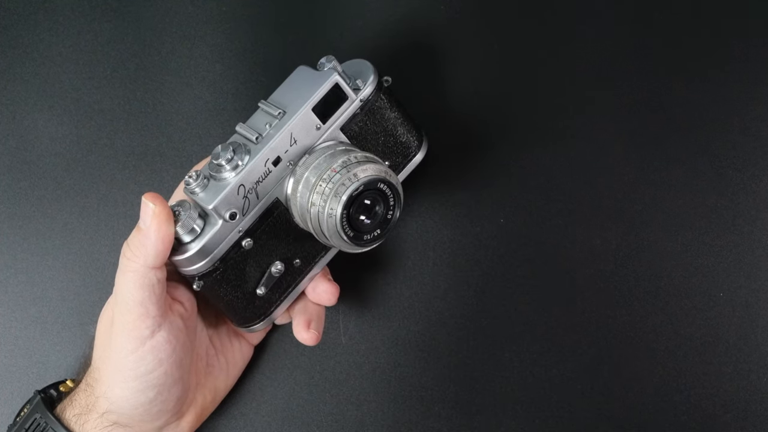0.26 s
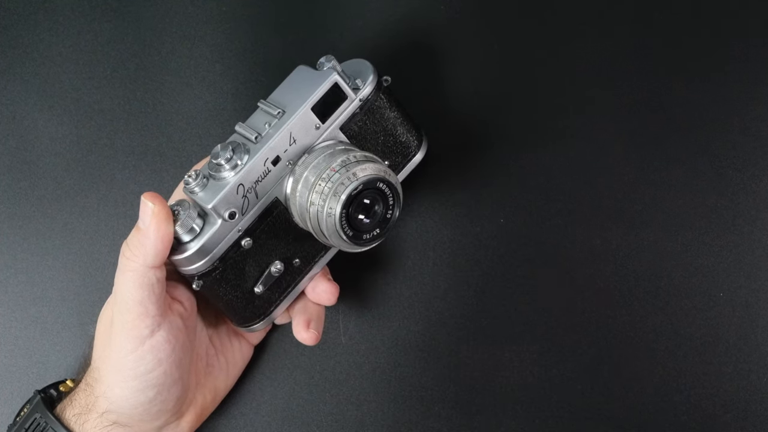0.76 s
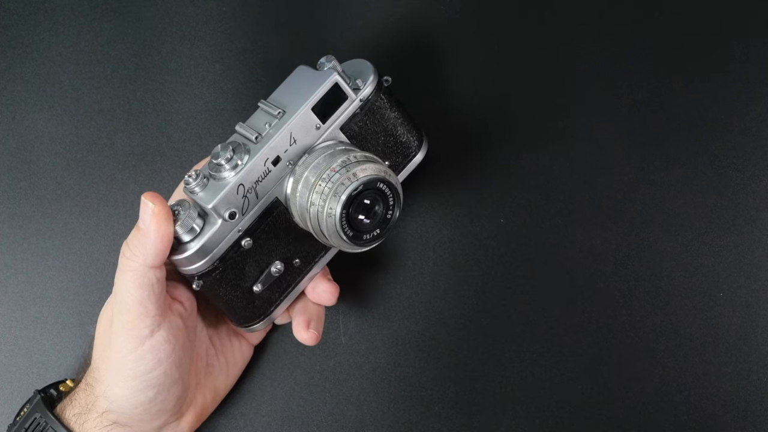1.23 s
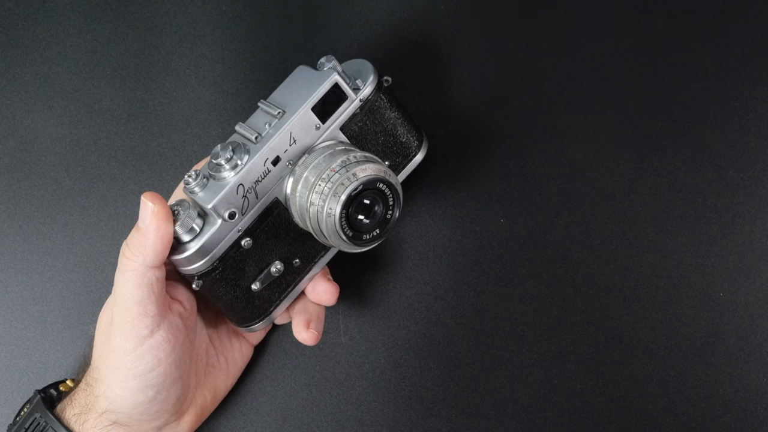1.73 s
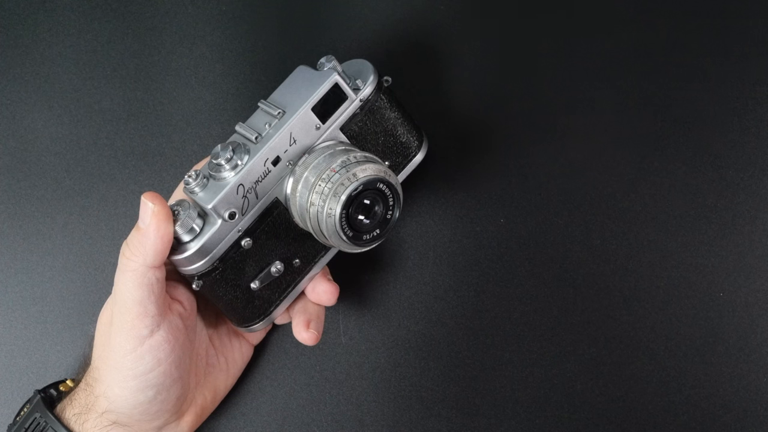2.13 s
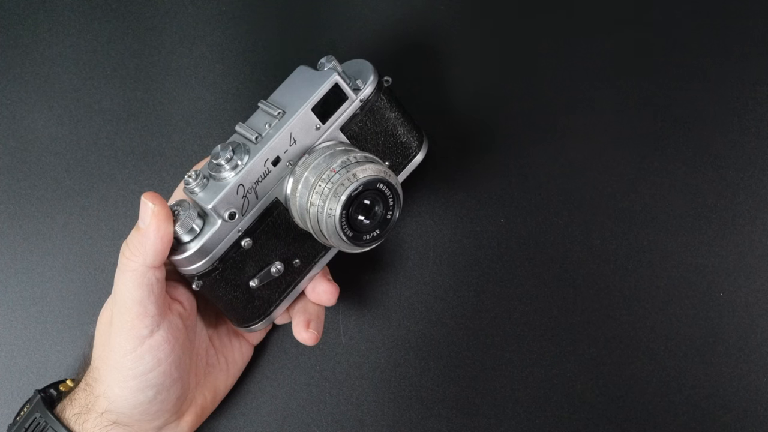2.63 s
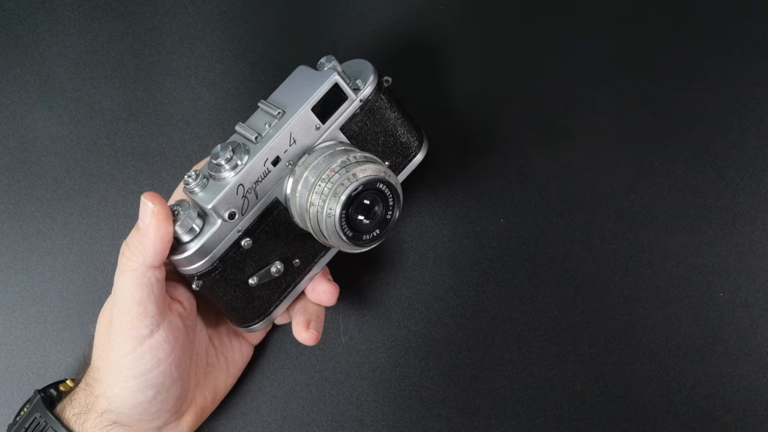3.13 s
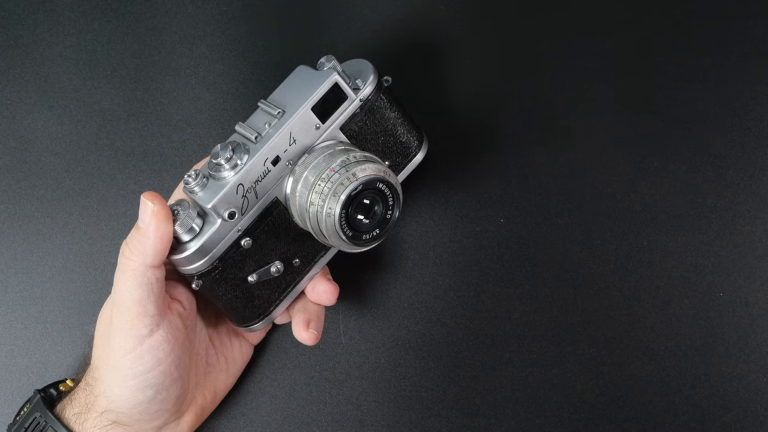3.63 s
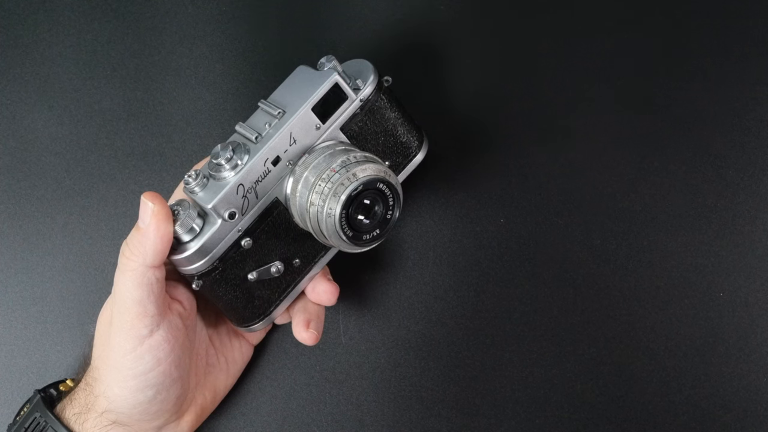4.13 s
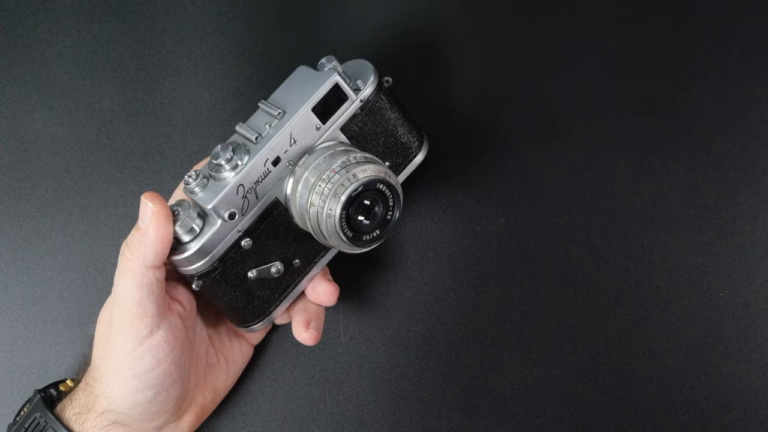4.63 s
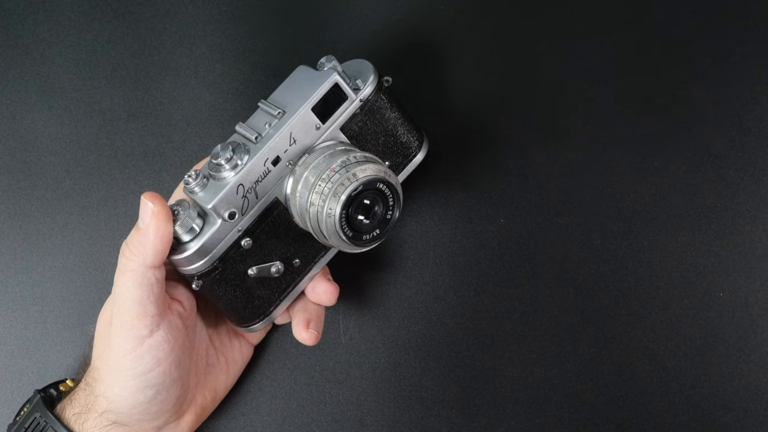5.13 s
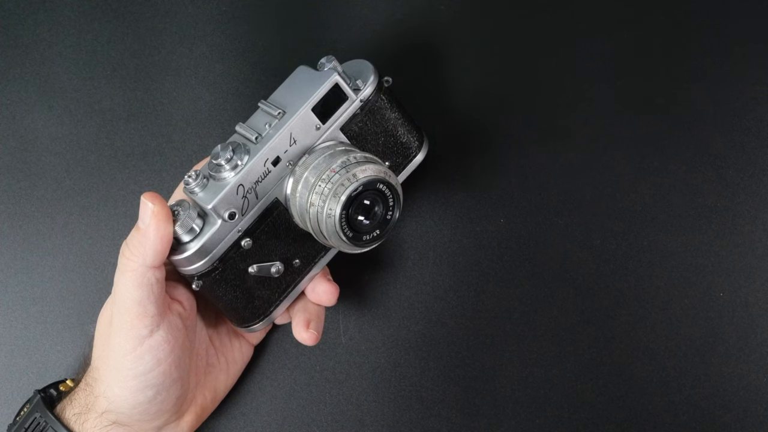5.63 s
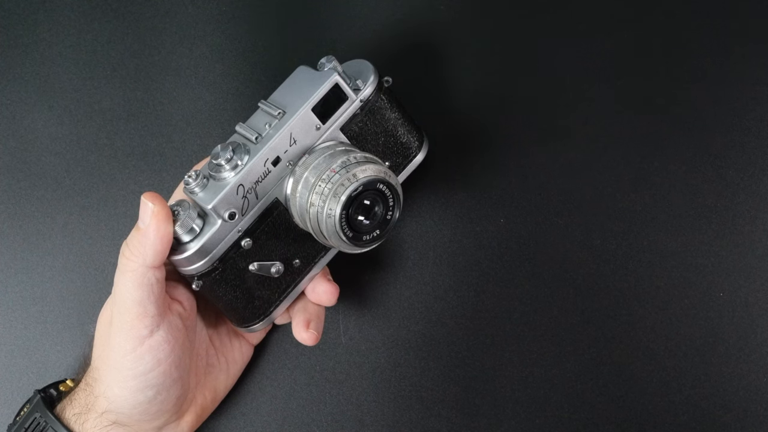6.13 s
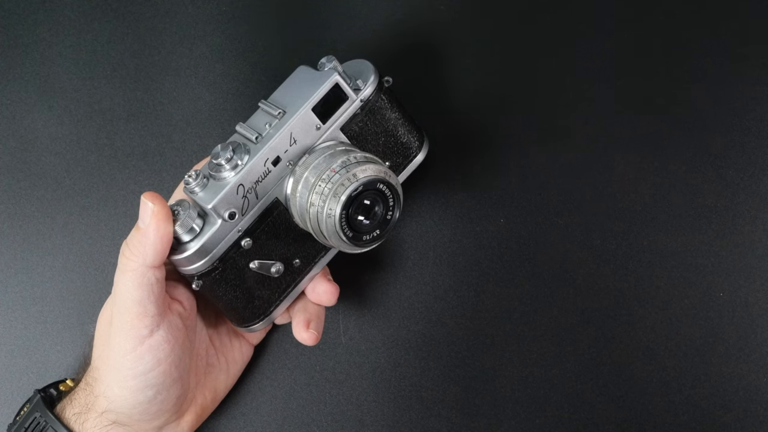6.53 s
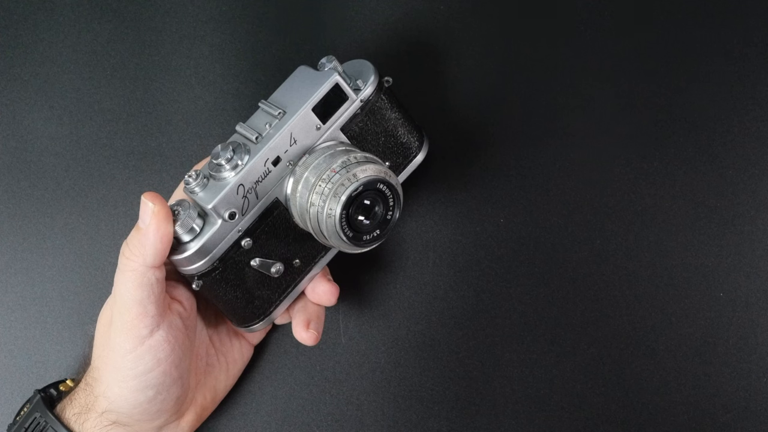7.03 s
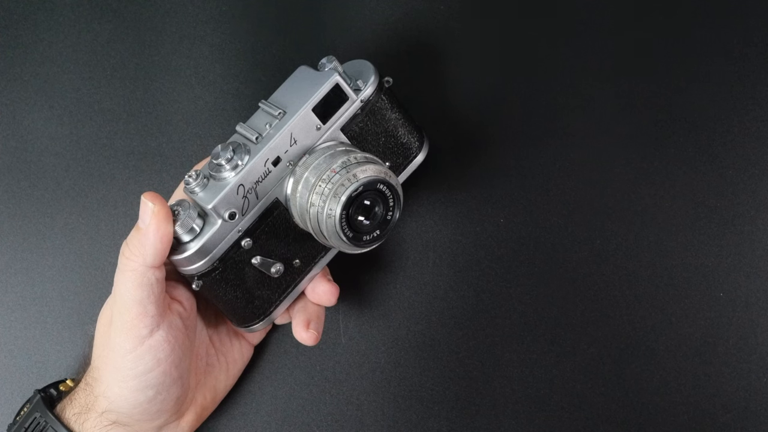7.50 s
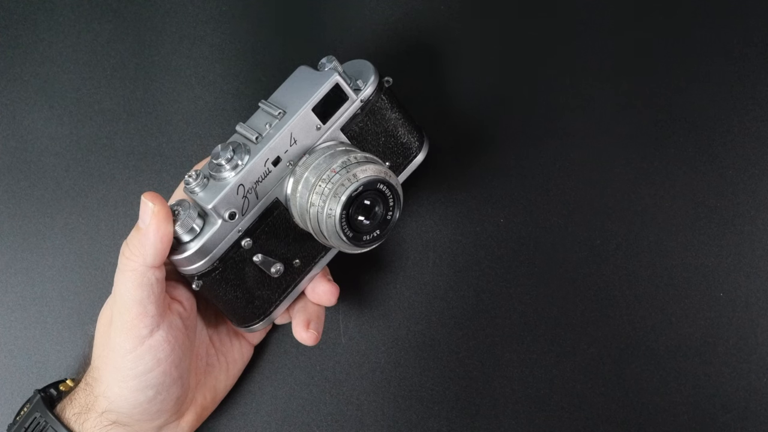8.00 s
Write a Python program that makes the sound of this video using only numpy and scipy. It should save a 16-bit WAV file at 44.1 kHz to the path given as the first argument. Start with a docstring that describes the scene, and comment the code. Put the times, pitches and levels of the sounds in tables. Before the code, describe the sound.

From 0 to about 8.3 seconds a small spring-driven timer in a hand-held metal camera runs without pause, heard very close in a quiet room. Its ticks and tocks, around 108 pairs a second, blend into a faint but clear, grainy whirr: dry steel chatter with bright ringing, lighter body-plate resonance and a fine random gear rattle, no bass. The pace wavers a little in regular cycles, steadier from 0.5 to 5 seconds, then slightly slower and more uneven. Soft dull thuds from the hand appear singly or in pairs, near 0.8, 1.4, 2, 2.7, 3.5, 4.1, 5.7 and 6.75 seconds. The mechanism sags around 6.5, catches with a few tiny brighter clicks at 6.54, races briefly near 6.9, then settles. The tone slowly shifts and weakens very slightly. Low hum, hand rumble and faint hiss stay beneath; room echo is short. It ends still whirring.

```python
"""The self-timer of a hand-held camera runs down close to the microphone in a quiet room.
A spring drives a 16-tooth wheel; its pallet rocks about 108 times a second, a tick and a tock each swing.
Each blow sets ringing filters going, tuned to the small steel parts and the body plates; dry snaps add bite.
Gears rattle at random moments all along and one catches late in the run, with a few brighter clicks.
Soft low thuds, hand rumble, hum tones, room noise and hiss lie below, made from swells, sines and noise."""
import sys
import numpy as np
from scipy import signal
from scipy.fft import rfft, irfft
from scipy.io import wavfile

SR = 44100
rng = np.random.default_rng(int(sys.argv[2]) if len(sys.argv) > 2 else 0)


def int16_out(signal):
    """Quantize to a 16-bit WAV file."""
    q = np.round(np.clip(np.atleast_2d(signal).T, -1, 1) * 32767)
    wavfile.write(sys.argv[1], SR, q.astype(np.int16))


N = 364266
TIME_S = np.arange(N) / SR

# how each tooth of the wheel strikes: (tick level [dB], tock level [dB], lateness [ms])
TEETH = [(-1.5, -0.5, -0.17), (0.1, 0.8, -0.31), (-1.1, -0.5, -0.24), (-0.5, -2.2, -0.11),
         (-1.5, 0.1, -0.01), (-0.6, 1.1, 0.03), (-0.5, -2, 0.03), (-3, -1, 0.14), (-1.8, 0.5, 0.14),
         (-0.4, -0.7, 0.03), (0, -1.5, 0.03), (-1.6, -0.5, 0.12), (-2.3, 0, 0.13), (-1.5, 0.5, 0.09),
         (-0.7, -1.2, 0.1), (-1.2, 1.5, 0.01)]
# how much stronger a tock is than a tick: (frequency [Hz], tock over tick [dB])
TOCK = [(1200, -13), (1800, 4.5), (2500, -1), (4500, -2), (6200, 5.5), (7200, 1.7), (9000, -2), (14000, 1)]
JITTER_MS = .12   # random timing error of blows and recoils


def from_db(db):
    """Turn a level in dB into a gain."""
    return 10 ** (np.asarray(db) / 20)


def rms_one(x):
    """Scale a signal to an rms (a kind of average size) of 1."""
    return x / np.sqrt(np.mean(x ** 2) + 1e-30)


def at_hz(points, hz):
    """Read a spectrum between its points, on a log-frequency axis."""
    points_hz, points_db = np.transpose(points)
    return np.interp(np.log(hz), np.log(points_hz), points_db)


def over_time(points):
    """Draw straight lines between (time, value) points, one value per sample."""
    return np.interp(TIME_S, *np.transpose(points))


def resonance(x, hz, width_hz):
    """A ringing part as a two-pole filter of gain 1 at its peak; a narrow one rings longer."""
    r = np.exp(-np.pi * max(width_hz, 1) / SR)
    top = [(1 - r * r) / 2, 0, (r * r - 1) / 2]
    bottom = [1, -2 * r * np.cos(2 * np.pi * hz / SR), r * r]
    return signal.lfilter(top, bottom, x + 1e-18)


def swing_count():
    """Count the swings: pace summed over time, pushed ahead and held back in regular cycles."""
    # pace under the spring, sagging before the catch and racing after: (time [s], pace [swings/s])
    pace = [(0.0, 108.33), (0.08, 112.21), (0.22, 102.68), (0.29, 107.55), (0.43, 109.18), (1.73, 110.22),
            (1.87, 111.14), (2.11, 105.61), (2.27, 109.66), (2.39, 113.25), (2.57, 109.9), (3.2, 112.28),
            (3.37, 111.59), (4.93, 108.93), (5.07, 102.23), (5.33, 104.77), (5.39, 108.72), (5.54, 103.63),
            (5.62, 107.16), (5.86, 100.09), (6.22, 103.43), (6.29, 101.75), (6.35, 108.5), (6.46, 96.79),
            (6.56, 106.79), (6.81, 110.88), (6.86, 115.57), (6.98, 110.76), (7.24, 105.29), (8.3, 106.41)]
    # periodic unevenness of the pace:
    # (cycle length [swings], push ahead and behind [swings], place of greatest lead [swings])
    pace_cycles = [(75.1, .26, 3.41), (82.4, .069, 6.5), (54, .05, -25.6), (36.3, .032, 1.2)]
    even = -.23 + np.cumsum(over_time(pace)) / SR   # starts just before swing 0
    count = even
    for _ in range(4):   # the cycles turn with the count itself, so refine it step by step
        count = even + sum(lead * np.cos(2 * np.pi * (count - ahead) / cycle)
                           for cycle, lead, ahead in pace_cycles)
    return count


def blows(swings):
    """Sample, strength in dB and kind (0 tick, 1 tock) of each pallet blow, by tooth and by chance."""
    tick_at, tock_at = -.14, .34   # place in the swing (swings)
    blow_spread_db = .5
    number = np.arange(2 * int(swings[-1]))
    kind = number % 2
    tooth = np.array(TEETH)[number // 2 % len(TEETH)]
    chance = rng.standard_normal((len(number), 2))
    when_s = np.interp(number // 2 + np.where(kind, tock_at, tick_at), swings, TIME_S)
    when_s = when_s + (tooth[:, 2] + JITTER_MS * chance[:, 0]) / 1000
    level_db = np.where(kind, tooth[:, 1], tooth[:, 0]) + blow_spread_db * chance[:, 1]
    return np.clip((when_s * SR).astype(int), 0, N - 1), level_db, kind


def recoils(swings):
    """Sample of each recoil: the wheel kicks back against its pinion after each tock."""
    recoil_at = .66   # place in the swing (swings)
    number = np.arange(int(swings[-1]))
    when = np.interp(number + recoil_at, swings, np.arange(N))
    when = when + JITTER_MS * rng.standard_normal(len(number)) * SR / 1000
    return np.clip(when, 0, N - 1).astype(int)


def rattle():
    """Loose gear teeth click at random moments, equally hard, pushing either way; rms 1."""
    clicks_per_s = 1500
    signs = rng.choice([-1, 1], N)
    return rms_one(signs * (rng.random(N) < clicks_per_s / SR))


def favoured_regions(count, spread_db):
    """Where a blow lands favours some regions of modes: part habit of the tooth, part chance, in dB."""
    tooth_share = .3      # part of the spread that returns with the same tooth
    linger_db, linger_swings = 0.54, 18
    top_db = 5            # favour above 0 dB levels off towards this
    kinds = 2 * len(TEETH)   # a tick and a tock for each tooth
    habit = rng.standard_normal((kinds, len(spread_db)))[np.arange(count) % kinds]
    fresh = rng.standard_normal((count, len(spread_db)))
    favour_db = spread_db * (np.sqrt(tooth_share) * habit + np.sqrt(1 - tooth_share) * fresh)
    # this noise tends to change sign at each blow, so the balance of tick and tock wanders slowly
    keep = np.exp(-.5 / linger_swings)
    wander = signal.lfilter([1], [1, keep], rng.standard_normal(fresh.shape), axis=0)
    favour_db = favour_db + linger_db * rms_one(wander)
    return np.where(favour_db > 0, top_db * np.tanh(favour_db / top_db), favour_db)


def ringing(modes, at, level_db, kind, back, gears):
    """Blows, bounces, recoils and rattle push each mode, one way the parts can ring; rms 1."""
    # slow shift of the whirr as the spring unwinds, with a jump back at the catch: (time [s], colour [-1..1])
    colour_points = [(0, 0.78), (.65, 0.95), (1.1, 0.62), (2.3, 0.091), (3.2, 0.41), (3.7, -0.22),
                     (5.3, -0.43), (6.52, -0.7), (6.56, -0.3), (6.95, -0.34), (7.4, -0.52), (8.26, -0.4)]
    # regions that a blow may favour: (frequency [Hz], spread from blow to blow [dB])
    regions = [(1200, -0.1), (2400, 0.5), (4500, 1.5), (6000, 1.5), (7100, 2), (8600, 2.5), (11000, 2),
               (14000, .8)]
    # middle body modes, of which only the ups and downs about the mean count: (time [s], level [dB])
    middle_points = [(0.0, -54), (0.02, -53.5), (0.27, -56), (0.69, -54), (0.8, -57), (0.83, -55),
                     (2.07, -55), (2.11, -58.5), (2.14, -55.5), (2.23, -54), (2.42, -55.5), (4.85, -55),
                     (5.1, -56.5), (5.5, -55), (5.59, -56.5), (6.37, -55), (6.46, -56.5), (6.9, -54.5),
                     (7.01, -57), (7.08, -53), (7.13, -57), (7.27, -55.5), (8.17, -55), (8.26, -55)]
    # rattle of the gears: (frequency [Hz], gears over blows [dB])
    rattle_spectrum = [(1200, -6), (2000, 2.5), (4000, 0.5), (5400, -3.5), (6300, -6), (7200, -18.5),
                       (9000, -19), (15000, -14)]
    # recoil of the wheel: (frequency [Hz], recoil over tick [dB])
    recoil_spectrum = [(1200, -21), (2500, -3), (4500, -7), (7000, -20), (9000, -13), (14000, -11)]
    mode_spread_db = 1.03
    bounce_ms, bounce_db = 1.1, -10.5
    contact_ms = .4        # a blow reaches each local mode at a moment of its own within this time
    whole_body_hz = 3500   # modes up to here are pushed the same way by every blow
    in_step_hz = 1600      # up to here they swing together, above it neighbours swing against each other
    skirt_hz = 900         # a push reaches a mode only through a band this wide around it

    out = np.zeros(N)
    colour = over_time(colour_points)
    middle_db = over_time(middle_points)
    middle_db = middle_db - middle_db.mean()
    bounce_delay = (bounce_ms * rng.uniform(.5, 1.5, len(at)) * SR / 1000).astype(int)
    again = np.minimum(at + bounce_delay, N - 1)
    centres, spread_db = np.transpose(regions)
    favour_db = favoured_regions(len(at), spread_db)

    for k, (hz, width_hz, mode_db, shift_db) in enumerate(modes):
        local = hz > whole_body_hz
        region_db = favour_db[:, np.argmin(abs(np.log(centres / hz)))]
        chance_db = mode_spread_db * rng.standard_normal(len(at))
        strength = from_db(level_db + region_db + kind * at_hz(TOCK, hz) + chance_db)
        recoil = from_db(at_hz(recoil_spectrum, hz)) * np.ones(len(back)) * (-1) ** k
        late = np.zeros(len(at), int)
        if local:
            strength = strength * rng.choice([-1, 1], len(at))
            recoil = recoil * rng.choice([-1, 1], len(back))
            late = (contact_ms * rng.random(len(at)) * SR / 1000).astype(int)
        if hz > in_step_hz:
            strength = strength * (-1) ** k

        clicks = np.zeros(N)
        clicks[np.minimum(again + late, N - 1)] = strength * from_db(bounce_db)
        clicks[np.minimum(at + late, N - 1)] = strength
        clicks[back] = recoil
        force = rms_one(rms_one(clicks) + from_db(at_hz(rattle_spectrum, hz)) * gears)
        ring = resonance(resonance(force, hz, skirt_hz), hz, width_hz)
        gain_db = mode_db + shift_db * colour
        if 1950 < hz < 3600:   # the middle body modes
            gain_db = gain_db + middle_db
        out += from_db(gain_db) * ring
    return rms_one(out)


def snap(at, level_db, kind):
    """Dry snap of steel on steel: each blow clicks in a few wide bands that hardly ring."""
    # bands of the snap: (frequency [Hz], width [Hz], level [dB])
    snap_bands = [(2710, 1500, -68.5), (5130, 1800, -65.5), (8690, 1600, -65), (10400, 1400, -77.5)]
    snap_spread_db = 2
    out = np.zeros(N)
    for hz, width_hz, band_db in snap_bands:
        chance_db = snap_spread_db * rng.standard_normal(len(at))
        clicks = np.zeros(N)
        clicks[at] = from_db(level_db + kind * at_hz(TOCK, hz) + chance_db)
        band = resonance(resonance(clicks, hz, width_hz), hz, width_hz)
        out += from_db(band_db) * rms_one(band)
    return out


def drive(swings, start_db, db_per_s, db_per_pace):
    """Loudness follows the pace of the moment and fades as the spring unwinds."""
    mean_pace = 108   # swings per s
    pace = np.gradient(swings) * SR
    return from_db(start_db + db_per_s * TIME_S + db_per_pace * (pace - mean_pace))


def clockwork():
    """Escapement and gears ring the steel parts and the body; the small body radiates no bass."""
    # modes of pallet and wheel: (frequency [Hz], width [Hz], level [dB], shift [dB per unit of colour])
    steel_modes = [(5860, 120, -8.5, 1.5), (6047, 44, -3, 0.5), (6214, 134, -3, -5.5), (6440, 120, -6, 5.5),
                   (6840, 43, -8, 1.1), (6779, 30, -1, -6), (6943, 300, 1, 0.5), (7140, 180, 0.5, -1),
                   (7153, 195, -1, 2), (7305, 41, -1, -3.5), (7490, 60, -1.5, 6.5), (8020, 88, 0.5, 0.5),
                   (8390, 380, -4.5, -3), (8660, 450, -7, 4.5), (8970, 67, -6, 4), (9083, 68, -2, -1.5),
                   (9600, 32, -29, -3), (10100, 270, -13, -1.5), (10200, 150, -23, 3),
                   (10530, 25, -10.5, -4), (10700, 42, -16, 0), (10960, 220, -9, -0.5),
                   (11240, 32, -21, -2), (11670, 130, -15.5, -4), (11600, 32, -19, 7), (12200, 271, -16, 0),
                   (12900, 330, -23, 0.1), (12900, 32, -21, -5), (13553, 110, -19, -3),
                   (13700, 240, -16, -1), (15400, 120, -52, -6)]
    # modes of the body plates: (frequency [Hz], width [Hz], level [dB], shift [dB per unit of colour])
    plate_modes = [(1202, 63, -3.5, -1.5), (1259, 71, -1, 0), (1391, 103, -2.5, -0.5), (1522, 33, -4.5, 3),
                   (1733, 210, -23, 3.5), (1813, 32, -17, 3), (2008, 125, -4.5, -3), (2106, 42, 1, -1.7),
                   (2206, 80, 1.5, -1.5), (2281, 38, 1.5, -0.5), (2387, 150, -8.5, 3), (2534, 51, -2, -0.3),
                   (2658, 44, 1.5, 1.5), (2720, 44, 0.5, -1.5), (3060, 100, -1, 0), (3182, 25, -1.5, -0.5),
                   (3310, 130, -2, 0), (3555, 58, -6, -1), (3720, 68, -2, 1.1), (4006, 120, -6, 0),
                   (4173, 86, -8.5, 2), (4357, 61, -4, 4.5), (4630, 110, -5.5, -5.5), (4773, 28, -7, -4),
                   (4830, 91, -9.5, 5), (5016, 32, -2, -5), (5188, 61, -5.5, -2.5), (5245, 71, -4, 0.5),
                   (5460, 64, -9, 1.5), (5780, 54, -9.5, 1)]
    swings = swing_count()
    hits = blows(swings)
    back, gears = recoils(swings), rattle()
    steel_gain = drive(swings, start_db=-53, db_per_s=-0.14, db_per_pace=0.12)
    plates_gain = drive(swings, start_db=-52, db_per_s=-0.053, db_per_pace=0.12)
    steel = steel_gain * ringing(steel_modes, *hits, back, gears)
    plates = plates_gain * ringing(plate_modes, *hits, back, gears)
    no_bass = signal.butter(8, 1080, "high", fs=SR, output="sos")   # edge in Hz
    return signal.sosfilt(no_bass, steel + plates + snap(*hits) + catch())


def room(x):
    """Echoes of the room as a tail of dying noise, duller than the direct sound; tail energy 1."""
    t60_s = 0.15   # time to die away by 60 dB
    t = np.arange(int(.5 * SR)) / SR
    dull_noise = signal.lfilter([1], [1, -.5], rng.standard_normal(len(t)))
    tail = dull_noise * from_db(-60 * t / t60_s) * (t > .004)   # the first echo comes after 4 ms
    return signal.fftconvolve(x, tail / np.sqrt(np.sum(tail ** 2)))[:N]


def background():
    """Filtered noise for room, hand rumble and wavering hum tones; a sine hum; microphone hiss."""
    # spectrum of the room noise, of which only the shape counts: (frequency [Hz], level per Hz [dB])
    air_spectrum = [(20, -38), (40, -13.5), (70, -15), (150, -10), (190, -2.5), (240, -10.5), (308, -2.5),
                    (465, -9.5), (630, -6), (700, -12.5), (804, -4.5), (950, -17), (1300, -26)]
    # rumble of the holding hand: (time [s], level [dB])
    rumble_level = [(0, -73.5), (.5, -83.5), (.92, -72), (2.05, -82.5), (3.2, -86.5), (4.0, -80),
                    (6.3, -88), (6.7, -82), (8.26, -93)]
    # wavering hum tones: (frequency [Hz], width [Hz], level [dB])
    hum_tones = [(191, 6.7, -81), (290.6, 8.3, -87.5), (344.7, 10, -85.5), (638, 8.3, -89),
                 (804, 11, -87.5), (863, 15, -89.5)]
    # random ups and downs of the low hum: (time [s], level [dB])
    low_hum_wander = [(0.0, -79), (.6, -78.5), (1.2, -77), (2, -81), (2.6, -76), (3.3, -80), (3.6, -79),
                      (4.05, -80.5), (4.09, -70), (4.85, -88), (5.02, -67), (5.22, -92), (5.27, -75),
                      (6.81, -80), (7.27, -89), (7.32, -78), (8.14, -78), (8.26, -87)]
    low_hum_hz, hiss_db = 191.72, -76.5
    air_db, air_db_per_s = -69, -0.29   # level at the start, and its slow fade

    hz = np.maximum(np.arange(N // 2 + 1) * SR / N, 1)
    air = rms_one(irfft(rfft(rng.standard_normal(N)) * from_db(at_hz(air_spectrum, hz)), N))
    air = from_db(air_db + air_db_per_s * TIME_S) * air

    low_band = signal.butter(2, [80, 180], "band", fs=SR, output="sos")
    low = signal.sosfilt(low_band, rng.standard_normal(N))
    rumble = from_db(over_time(rumble_level)) * rms_one(low)

    hum = np.sqrt(2) * np.sin(2 * np.pi * low_hum_hz * TIME_S)   # rms 1
    hum = from_db(over_time(low_hum_wander)) * hum
    for tone_hz, width_hz, level_db in hum_tones:
        hum += from_db(level_db) * rms_one(resonance(rng.standard_normal(N), tone_hz, width_hz))
    hiss = from_db(hiss_db) * rng.standard_normal(N)
    return air + rumble + hum + hiss


def thuds():
    """Soft thuds through the hand: about two cycles of low swing under a smooth hump."""
    # the thuds: (time [s], level [dB], frequency [Hz])
    thud_list = [(0.155, -59, 145), (0.75, -57, 170), (0.796, -58, 131), (1.423, -58, 156),
                 (2.04, -58, 131), (2.056, -59, 178), (2.684, -57.5, 149), (3.349, -56, 152),
                 (3.505, -55, 175), (3.509, -62, 400), (3.531, -60, 124), (4.058, -55, 159),
                 (4.097, -57.5, 188), (4.536, -58, 238), (4.828, -59.5, 133), (5.191, -63, 167),
                 (5.732, -54, 150), (6.652, -60, 165), (6.758, -55, 194), (6.762, -64, 350),
                 (7.514, -58, 150)]
    push = 0.13   # share of one-sided push under the swing
    out = np.zeros(N)
    for start_s, level_db, hz in thud_list:
        t = np.arange(int(2.1 * SR / hz)) / SR
        swing = push - np.cos(2 * np.pi * hz * (t - t[-1] / 2))
        pulse = swing * np.hanning(len(t))
        start = int(start_s * SR)
        out[start:start + len(t)] += from_db(level_db) * pulse
    return out


def catch():
    """A gear catches once: a few short bright clicks, each ringing briefly at its own pitch."""
    # the clicks: (time [s], peak level [dB], frequency [Hz])
    catch_clicks = [(6.5365, -41, 4870), (6.5385, -46, 2180), (6.545, -44, 3000), (6.548, -42, 1900)]
    width_hz = 1000
    out = np.zeros(N)
    click = signal.unit_impulse(SR // 50)
    for start_s, level_db, hz in catch_clicks:
        ring = resonance(resonance(click, hz, width_hz), hz, width_hz)
        start = int(start_s * SR)
        out[start:start + len(ring)] += from_db(level_db) * ring / abs(ring).max()
    return out


def scene():
    """The camera and its echoes in the room, with the thuds, over the background."""
    room_db = -15.5
    camera = clockwork()
    mix = camera + from_db(room_db) * room(camera) + thuds() + background()
    return mix[None]


def record(dry):
    """A steep low-pass filter cuts the very top, above 15740 Hz."""
    low_pass = signal.ellip(12, .5, 60, 15740, fs=SR, output="sos")   # ripple .5 dB, depth 60 dB
    return signal.sosfilt(low_pass, dry)


dry = scene()
out = record(dry)
int16_out(out)
```